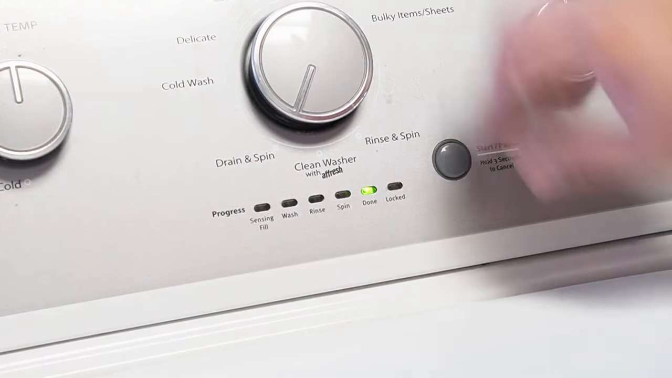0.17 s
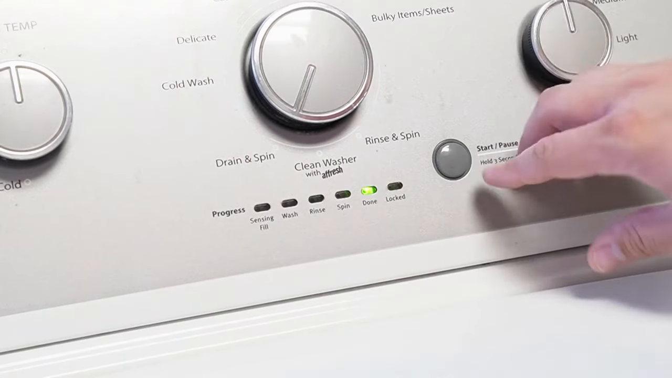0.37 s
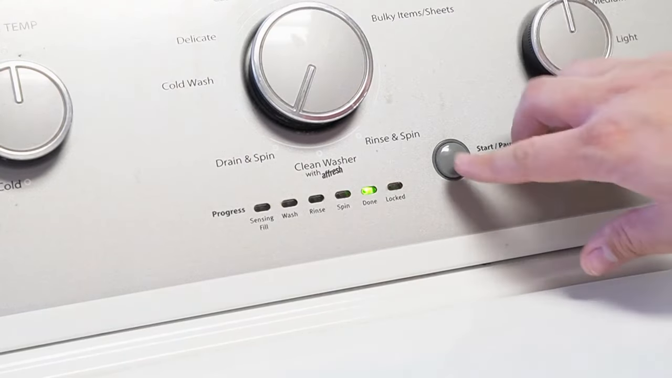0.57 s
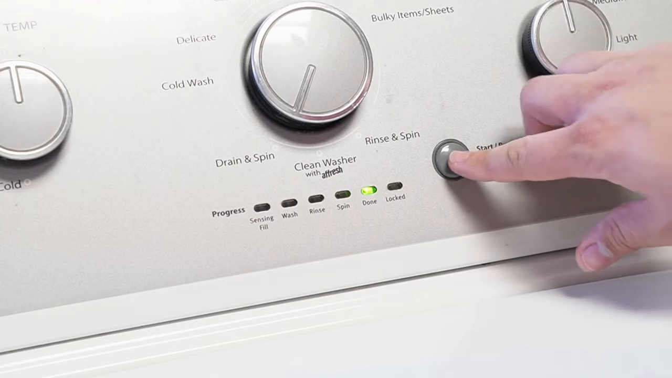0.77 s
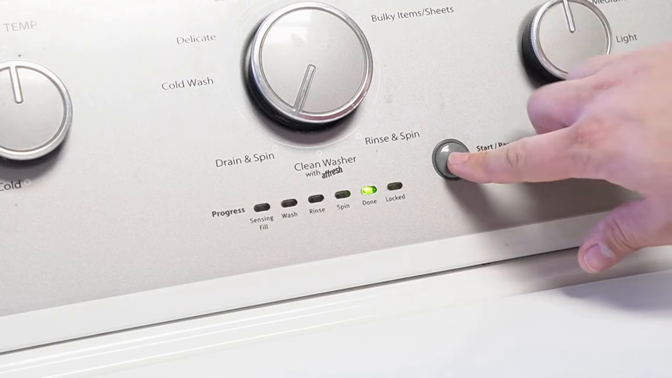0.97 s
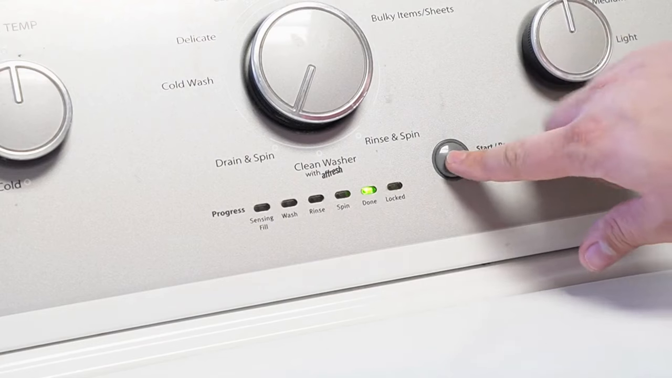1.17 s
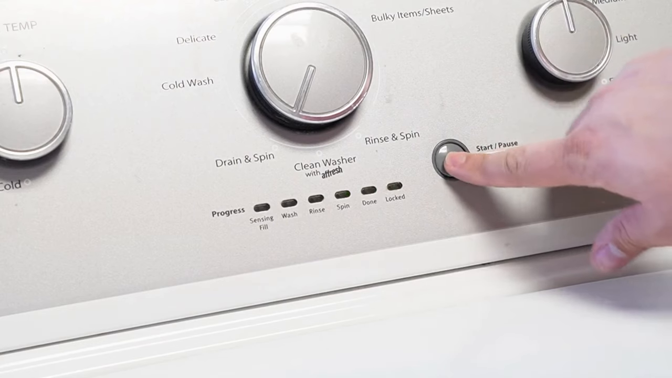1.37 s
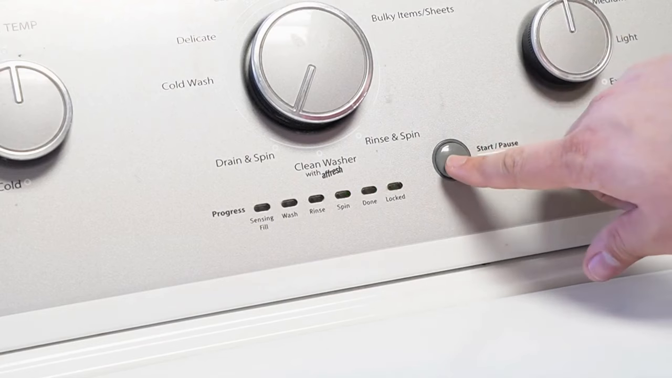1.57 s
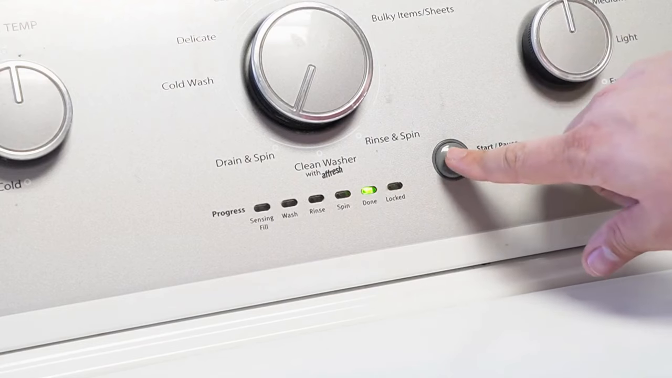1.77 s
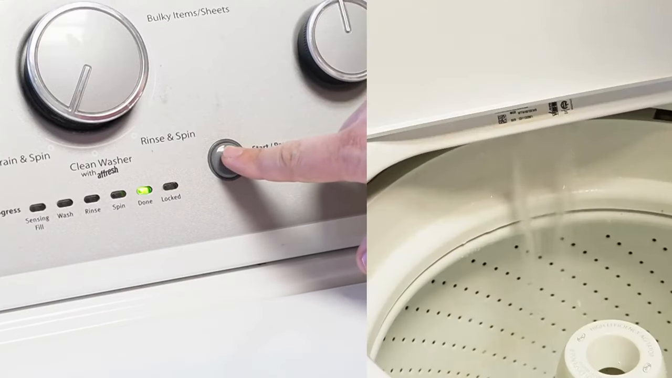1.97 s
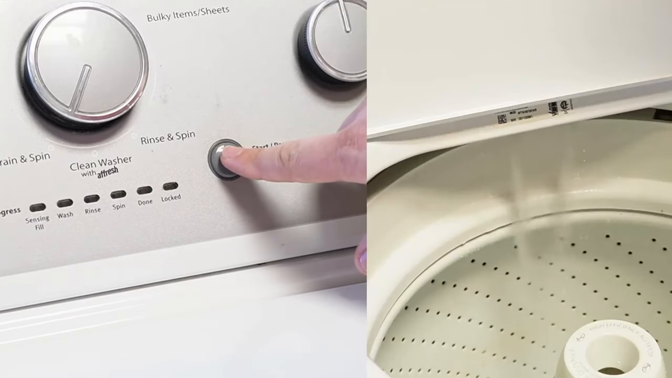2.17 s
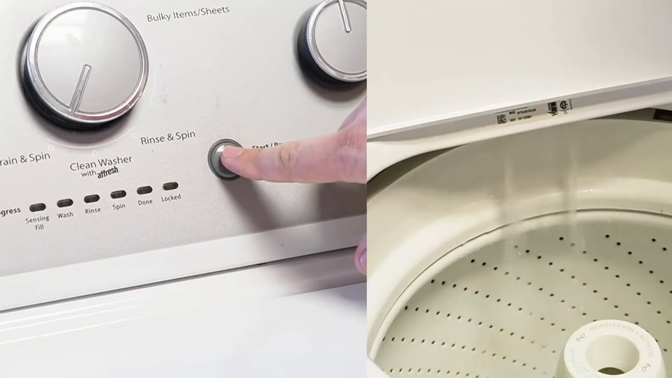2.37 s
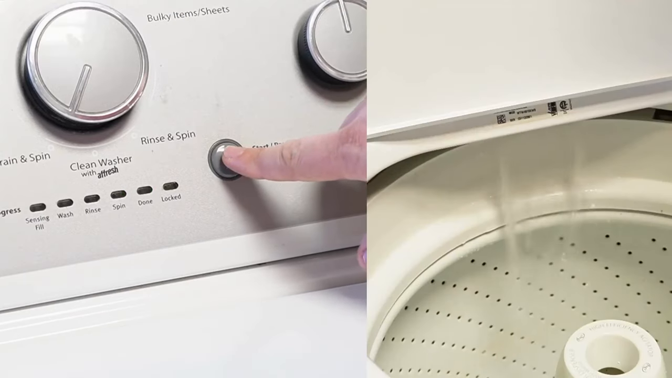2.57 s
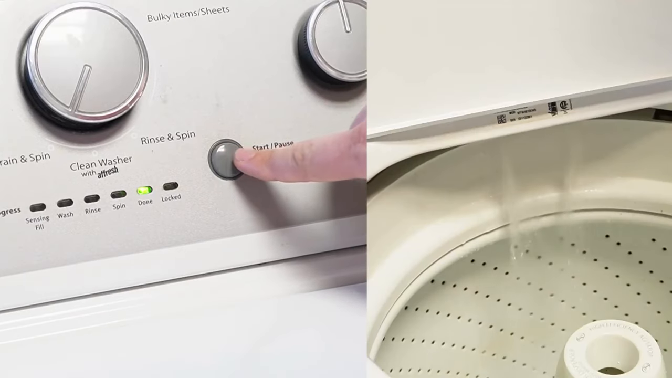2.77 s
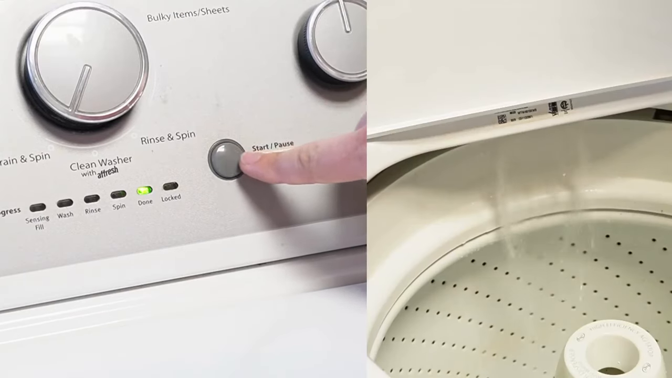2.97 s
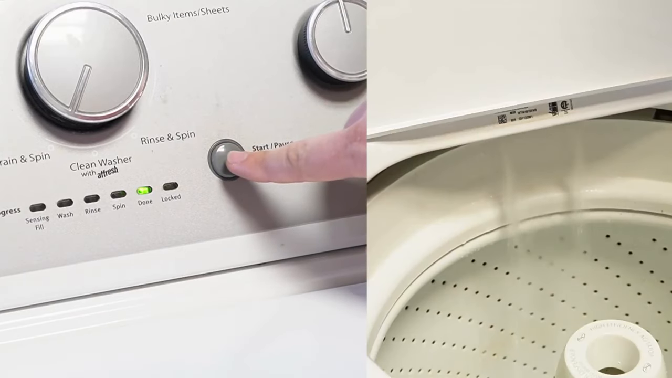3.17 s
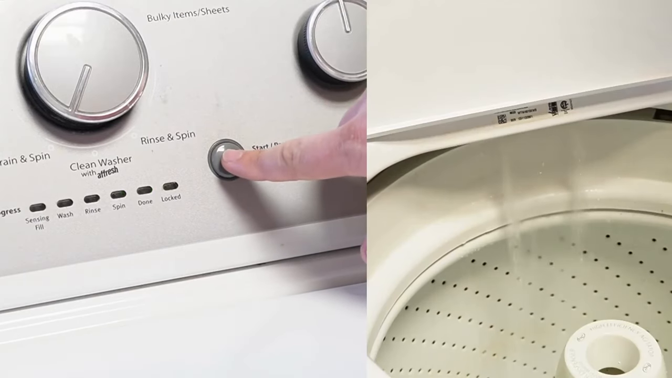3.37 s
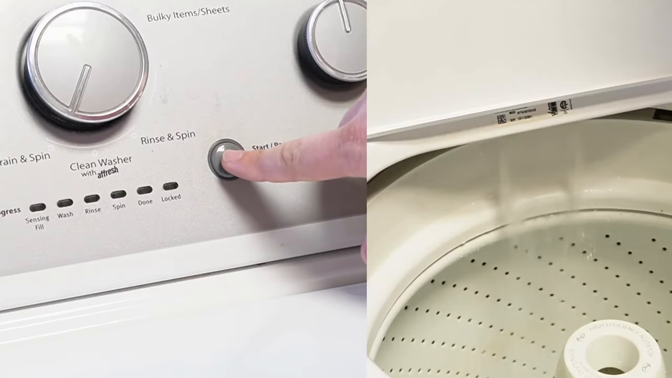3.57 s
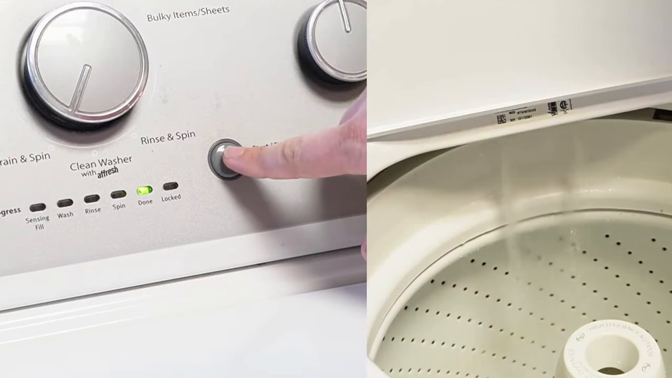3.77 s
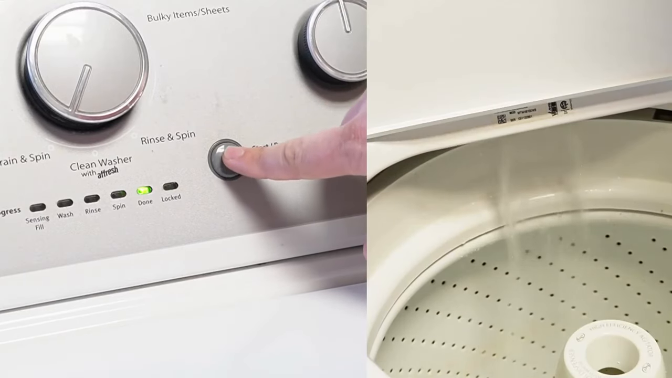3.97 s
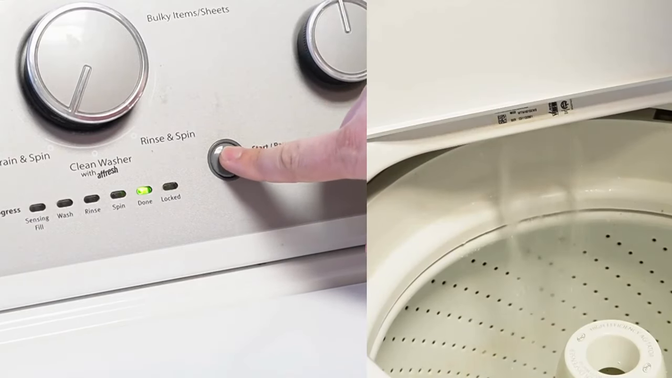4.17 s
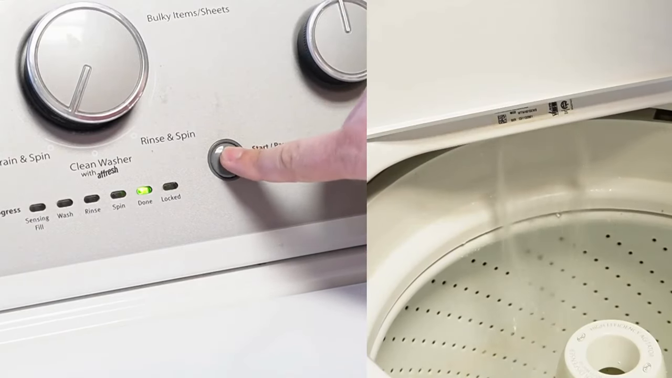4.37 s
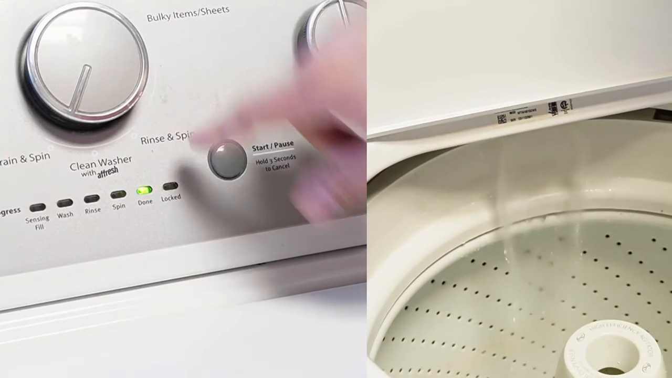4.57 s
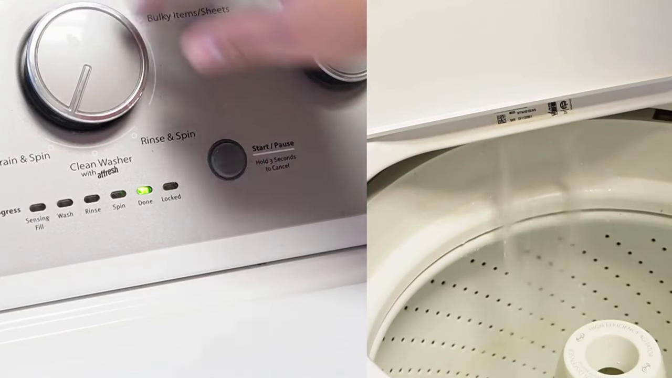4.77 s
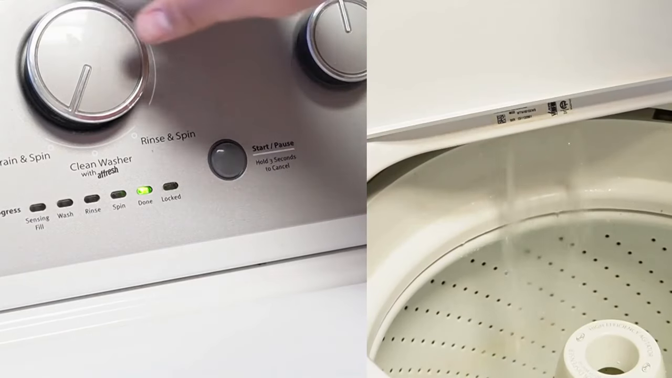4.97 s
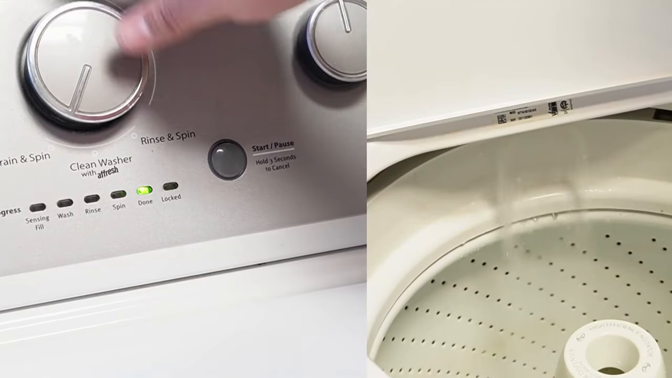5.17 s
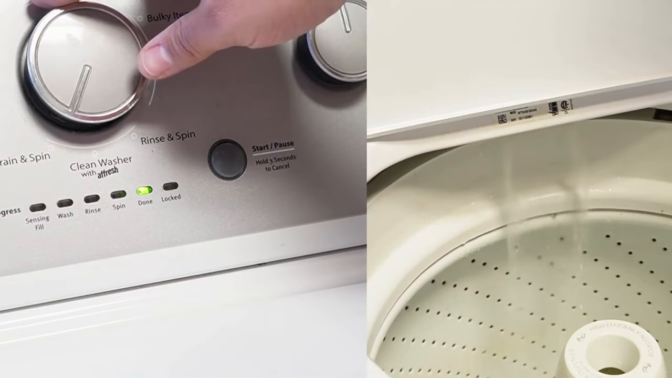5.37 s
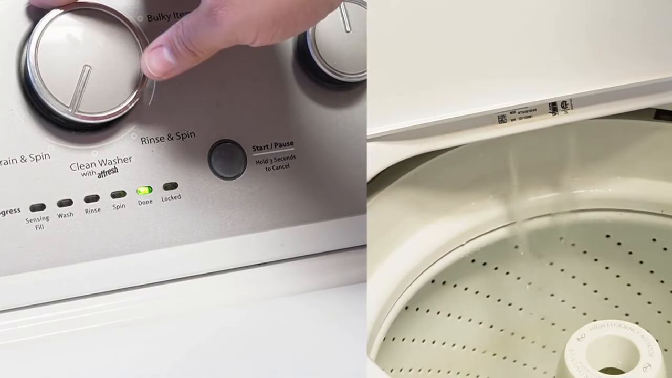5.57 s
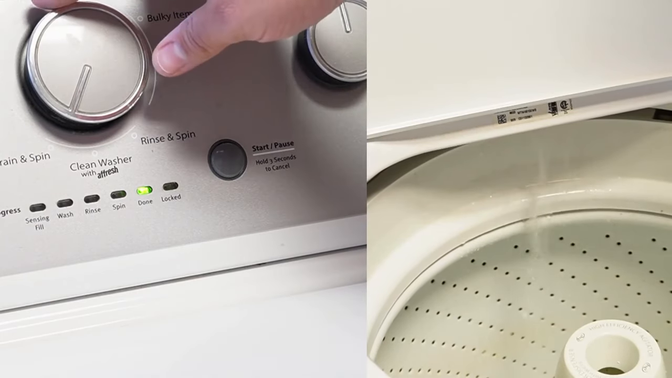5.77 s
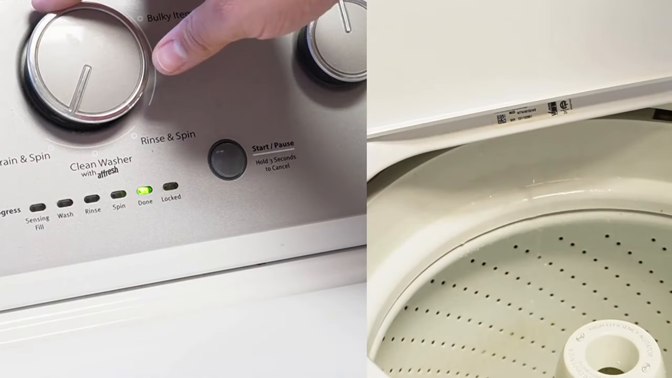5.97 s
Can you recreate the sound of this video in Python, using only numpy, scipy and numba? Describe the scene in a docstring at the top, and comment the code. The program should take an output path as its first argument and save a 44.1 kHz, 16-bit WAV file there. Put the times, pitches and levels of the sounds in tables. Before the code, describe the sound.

After a soft brush and firm button press in a quiet room, a valve snaps, pipes hiss, then water jets sputter brightly into a hollow empty tub.

```python
"""Filling a top-load washer

In a quiet room a hand brushes and presses the panel: grained friction noise and pushes excite its modes.
A valve snaps open and the pipe hisses: turbulent noise in bands, its boom and treble fading as the air goes.
Then jets sputter out: resonant noise bursts spit over a fine spray of hiss, small spurts and drops.
The falling water drums the hollow tub: uneven noise rings its modes."""
import sys
import numpy as np
from scipy import signal
from scipy.fft import rfft, irfft, next_fast_len
from scipy.io import wavfile
from scipy.ndimage import uniform_filter1d
from numba import njit

SR = 44100
rng = np.random.default_rng(int(sys.argv[2]) if len(sys.argv) > 2 else 0)


def materialize(psi):
    """Save the field psi as 16-bit PCM at rate SR to the path in sys.argv[1].

    A 1-D psi becomes a single channel; in a 2-D psi each row is a channel.
    """
    bounded = np.clip(np.atleast_2d(psi).T, -1, 1)
    quanta = np.round(bounded * 32767).astype(np.int16)
    wavfile.write(sys.argv[1], SR, quanta)


N = 265614


def undb(db):
    """Decibel law: dB to amplitude gain."""
    return 10 ** (np.asarray(db) / 20)


def unit(x):
    """Power normalisation: scale to rms 1."""
    return x / np.sqrt(np.mean(x ** 2))


def clock():
    """Sampling: seconds at every sample."""
    return np.arange(N) / SR


def curve(table):
    """Linear interpolation: an (s, dB) table at every sample, -200 dB outside its span."""
    rows = np.array(table)
    return np.interp(clock(), rows[:, 0], rows[:, 1], left=-200, right=-200)


def colour(x, spectrum):
    """Spectral shaping: filter by (Hz, dB) points joined on a log-frequency axis."""
    hz, db = np.transpose(spectrum)
    size = next_fast_len(N)
    bins = np.maximum(np.arange(size // 2 + 1) * SR / size, 1)
    gain = undb(np.interp(np.log(bins), np.log(hz), db))
    return irfft(rfft(x, size) * gain, size)[:N]


def noise():
    """White noise: equal power at all frequencies."""
    return rng.standard_normal(N)


def walk(rate):
    """Slow random modulation: levels held 1 / rate s and smoothed twice, rms 1."""
    held = int(SR / rate)
    steps = np.repeat(rng.standard_normal(N // held + 1), held)
    return unit(uniform_filter1d(uniform_filter1d(steps, held), held)[:N])


def resonance(x, hz, width):
    """Simple resonator: two-pole band-pass, gain 1 at the centre."""
    return signal.lfilter(*signal.iirpeak(hz, hz / width, SR), x)


def butter(x, order, hz, kind):
    """Frequency selection by a Butterworth filter."""
    return signal.sosfilt(signal.butter(order, hz, kind, fs=SR, output="sos"), x)


def split(x, *hz):
    """Band division: neighbouring bands of x parted at the given frequencies, each of rms 1."""
    bands = []
    for edge in hz:
        bands.append(butter(x, 4, edge, "low"))
        x = butter(x, 4, edge, "high")
    return [unit(band) for band in bands + [x]]


def patchy(depth_db, rate):
    """Independent modulation: noise bands flicker each on its own, as separate threads of water do."""
    centres = 60 * 1.5 ** np.arange(14)
    return unit(sum(undb(depth_db * walk(rate)) * resonance(noise(), hz, hz / 2) for hz in centres))


@njit
def bursts(start, size, hz, t60, spread, broad, crack, rise, slap, hiss):
    """Excited resonance: a slap and cracking noise ring a band, whose tail outlasts a broad spit."""
    out = np.zeros(len(hiss))
    for e in range(len(start)):
        # state-variable filter: tuning g, damping = relative bandwidth
        g, damping, band, low = np.tan(np.pi * hz[e] / SR), spread, 0., 0.
        fall = np.exp(-np.log(1000) / (t60[e] * SR))
        loud, spitting, onset = size[e], broad, 0.
        narrow = np.sqrt(SR / (np.pi * spread * hz[e]))  # makes up for the power lost outside the band
        for i in range(start[e], min(len(hiss), start[e] + int(t60[e] * SR))):
            sharp = 1 + crack * np.exp((start[e] - i) / (2 * rise * SR))
            x = hiss[(i + 7919 * e) % len(hiss)] * sharp
            push = slap if i == start[e] + int(rise * SR) else 0.
            v = (band + g * (x + push - low)) / (1 + g * (g + damping))
            band, low = 2 * v - band, low + 2 * g * v
            onset += (1 - onset) / (rise * SR)
            out[i] += loud * onset * (narrow * damping * v + spitting * x)
            loud *= fall
            spitting *= fall  # falls on top of loud, so the broad spit dies first
    return out


def spit(s, db, hz, t60, spread, broad, crack=0., rise=0.00038, slap=0.):
    """Burst excitation: crackling noise rings a band at each of the times s."""
    crackle = unit(noise() * undb(1.4 * walk(2500)))
    start = (s * SR).astype(np.int64)
    hz, t60 = np.clip(hz, 500, .4 * SR), np.clip(t60, .004, .4)
    return bursts(start, undb(db), hz, t60, max(spread, .05), broad, crack, max(rise, 2 / SR), slap, crackle)


# Spectrum of the quiet room. Each row: frequency in Hz, relative level in dB per Hz.
ROOM_SPECTRUM = [(12, -44), (20, 8), (59, -8), (145, -11), (469, -20.5), (674, -22), (1510, -28.5),
                 (2000, -27.5), (2370, -30), (15800, -37)]
# Faint wavering tones. Each row: centre in Hz, width in Hz, level in dB.
ROOM_HUMS = [(475, 20, -82.5), (1580, 15, -90)]
ROOM_DB = -67.5


def room():
    """Stationary noise floor: coloured noise, with narrow bands of noise heard as wavering tones."""
    floor = undb(ROOM_DB + 0.98 * walk(9.7)) * unit(colour(noise(), ROOM_SPECTRUM))
    hums = sum(undb(db + 3.5 * walk(5.2)) * unit(resonance(noise(), hz, width)) for hz, width, db in ROOM_HUMS)
    return floor + hums


def flutter():
    """Exponential decay: a low narrow-band flutter dies away from the start."""
    start_db, db_per_s = -64, -51
    return undb(start_db + db_per_s * clock()) * unit(resonance(noise(), 28, 12))


# Spectrum of skin friction. Each row: frequency in Hz, relative level in dB per Hz.
SKIN_SPECTRUM = [(88, -43), (150, -14), (382, -2), (459, -6), (810, -5.5), (1280, -15.5), (2950, -18.5),
                 (3200, -19), (3500, -20), (12000, -33.5), (15600, -66), (22000, -120)]
# Skin brushing the panel. Each row: start in seconds, time held in seconds, level in dB, fade in dB per second.
BRUSH_STROKES = [(.345, 0.0037, -64, 900), (.44, .025, -72.5, 150), (.525, 0.035, -70, 300),
                 (.58, .027, -73, 1500), (1.1, .01, -76, 100), (1.158, .014, -65, 600),
                 (1.178, 0.005, -57, 1000), (1.204, 0.0032, -52, 1100), (1.225, 0.03, -69.5, 250)]
BRUSH_SWELL_DB_PER_S = 1800


def brushing():
    """Friction noise: skin rustles in uneven grains, swelling and fading with each stroke."""
    skin = colour(noise() * undb(1.4 * walk(220)), SKIN_SPECTRUM)
    skin = skin / resonance(skin, 2500, 5000).std()
    now = clock()
    strokes = 0
    for s, held, db, fade in BRUSH_STROKES:
        swell = BRUSH_SWELL_DB_PER_S * np.maximum(s - now, 0)
        strokes = strokes + undb(db - swell - fade * np.maximum(now - s - held, 0))
    return skin * strokes


# Modes of the sheet-metal panel. Each row: frequency in Hz, relative level in dB, decay time T60 in seconds.
PANEL_MODES = [(376, 3.5, 0.068), (477, -17, 0.041), (600, 6.5, 0.03), (780, 2.5, 0.037), (900, 4, 0.035),
               (1420, -12, 0.036), (326, -11, 0.24), (522, -15.5, 0.29), (700, -15, 0.24)]
# Knocks on the panel. Each row: time in seconds, peak level in dB.
PANEL_KNOCKS = [(0.355, -52.5), (0.537, -58), (1.096, -64), (1.177, -48), (1.201, -29.5)]
SKIN_RINGS_DB = -22  # how much of the rustle's slope passes into the panel


def hand():
    """Modal excitation: soft pushes and the rustle of skin ring the sheet-metal panel."""
    rustle = brushing()
    t = np.arange(int(.3 * SR)) / SR
    ring = 0
    for k, (hz, db, t60) in enumerate(PANEL_MODES):
        decay = 1000 ** (-t / np.clip(t60, .02, .4))
        ring = ring + undb(db) * np.sin(2 * np.pi * hz * t + k ** 2) * decay
    ring = ring * (1 - np.exp(-t / 0.0017)) ** 2  # soft onset
    blows = np.zeros(N)
    for s, db in PANEL_KNOCKS:
        blows[int(s * SR)] = undb(db)
    drive = blows + undb(SKIN_RINGS_DB) * np.diff(rustle, prepend=0)
    return rustle + signal.fftconvolve(drive, ring / np.abs(ring).max())[:N]


# The valve opens on a murmur, then water reaches the pipe and drives the air out until the jets begin.
VALVE_S, WATER_S, AIR_GONE_S, JETS_S = 1.3, 1.389, 1.59, 1.858
# Ringing of the valve snap. Each row: frequency in Hz, level in dB, decay time T60 in seconds.
VALVE_SNAP = [(2960, -39.5, 0.046), (5800, -40, 0.044), (9000, -37.5, 0.043)]


def valve():
    """Impulsive excitation: the snap cracks and rings three bands at once."""
    hz, db, t60 = np.transpose(VALVE_SNAP)
    return spit(np.full(len(hz), VALVE_S), db, hz, t60, spread=0.23, broad=0., crack=1.)


# Rush as heard through the cabinet. Each row: frequency in Hz, relative level in dB per Hz.
PIPE_SPECTRUM = [(35, -49.5), (60, -7), (167, -10.5), (240, 3), (400, -1.5), (817, -1), (1240, -4.5),
                 (2080, -13), (5660, -20), (8820, -20.5), (15800, -25)]
# Resonances of the feed pipe. Each row: centre in Hz, width in Hz, mean gain in dB.
PIPE_RESONANCES = [(2100, 80, 0), (2860, 290, -0.5), (3330, 120, 0), (4500, 410, -1), (5260, 120, -6)]
MURMUR_DB, MURMUR_DB_PER_S, RUSH_DB, RUSH_SWELL_DB_PER_S = -51.5, -90, -44.5, 330
# band levels against the middle of the rush, and what the air adds to each
PIPE_BOOM_DB, PIPE_HISS_DB, PIPE_TOP_DB = -5, -8.5, -15.5
AIR_BOOM_DB, AIR_HISS_DB, AIR_TOP_DB = 9, 9, 9
AIR_HELD_S = 0.092  # full air for this long after the water comes


def pipe():
    """Turbulent flow noise: a resonant rush whose boom and treble stay strong at first, then fade as the air goes."""
    rush = patchy(1.6, 59.9) * undb(0.61 * walk(120))
    rush = rush + sum(undb(db + 5.2 * walk(24.9)) * resonance(rush, hz, width)
                      for hz, width, db in PIPE_RESONANCES)
    boom, body, hiss, top = split(colour(rush, PIPE_SPECTRUM), 450, 2500, 7000)
    t = clock()
    air = np.interp(t, [WATER_S + AIR_HELD_S, AIR_GONE_S], [1, 0])
    murmur_db = MURMUR_DB + MURMUR_DB_PER_S * (t - VALVE_S)
    rush_db = np.clip(RUSH_DB + RUSH_SWELL_DB_PER_S * (t - WATER_S), murmur_db, RUSH_DB)
    is_open = (t > VALVE_S) * (t < JETS_S)
    mix = body + undb(PIPE_HISS_DB + AIR_HISS_DB * air) * hiss
    mix = mix + undb(PIPE_TOP_DB + AIR_TOP_DB * air ** 1.8) * top
    mix = mix + undb(PIPE_BOOM_DB + AIR_BOOM_DB * air + 2.2 * walk(45.1)) * boom
    return undb(rush_db) * is_open * mix


# Surges and dips of the flow. Each row: centre in seconds, half-length in seconds, spray swell in dB.
FLOW_SURGES = [(1.912, 0.019, 2.5), (3.443, 0.037, 2.5), (4.75, 0.085, 3), (5.551, 0.035, 5.5),
               (5.62, 0.011, 3.5), (5.685, 0.018, -2), (5.9, 0.028, -3)]
SLACK_S, SLACK_DB_PER_S, SLACK_MOST_DB = 5.664, -26, -8  # the jets slacken at the end


def flow():
    """Common modulation: seconds since the jets began, surge and slack in dB, and -200 dB while shut."""
    t = clock()
    surge = sum(db * np.exp(-((t - s) / length) ** 2) for s, length, db in FLOW_SURGES)
    slack = np.clip(SLACK_DB_PER_S * (t - SLACK_S), SLACK_MOST_DB, 0)
    return t - JETS_S, surge, slack, np.where(t < JETS_S, -200, 0)


GATHERS_S = 0.13  # time constant of the gathering water


def gathering(since):
    """Exponential relaxation: shortfall from 1 to 0 as water gathers."""
    return np.exp(-np.maximum(since, 0) / GATHERS_S)


DRUM_DB, DRUM_LATE_DB = -35.5, 3  # the drumming starts soft until water gathers
DRUM_PER_SURGE, DRUM_PER_SLACK = 1.02, 0.69  # dB of drumming per dB of spray


def drumming_db():
    """Flow-dependent impact level: dB of the water on the tub."""
    since, surge, slack, shut = flow()
    return DRUM_DB - DRUM_LATE_DB * gathering(since) + DRUM_PER_SURGE * surge + DRUM_PER_SLACK * slack + shut


def rumble():
    """Flow-coupled low-frequency noise: a twice-filtered band rises with the drumming."""
    low = resonance(resonance(noise(), 58, 70), 58, 90)
    return undb(-42.5 + 0.63 * drumming_db()) * unit(low)


# Modes of the empty tub. Each row: frequency in Hz, width in Hz, relative level in dB per Hz.
TUB_MODES = [(81, 5.5, -13.5), (156.8, 28.4, -9), (233.8, 27, -7), (364, 33.4, -9.5), (446, 183, -13.5),
             (566.4, 64, -6), (641.3, 32.3, -3.5), (818, 96, -8), (1147, 110, -17)]
# Chance swells of a narrow noise band heard as a hollow note. Each row: time in seconds, level in dB.
HOLLOW_SWELLS = [(1.86, -43), (2.15, -41), (3.03, -46), (3.09, -36), (4.61, -41), (4.64, -29.5), (4.8, -43),
                 (5.22, -35), (5.37, -55), (5.49, -36.5), (6.02, -44)]
HOLLOW_HZ = 268.3


def tub():
    """Modal response: uneven lumps of water ring the empty tub; a narrow noise band is heard as a hollow note."""
    lumps = noise() * undb(2.0 * walk(90))
    drum = 0
    for k, (hz, width, db) in enumerate(TUB_MODES):
        mode = unit(resonance(lumps, hz, width)) * np.sqrt(width)
        drum = drum + (-1) ** k * undb(db + 2.2 * walk(18)) * mode
    drum = butter(drum, 2, [70, 1300], "band")
    hollow = resonance(resonance(lumps, HOLLOW_HZ, 15), HOLLOW_HZ, 69)
    return undb(drumming_db()) * unit(drum) + undb(curve(HOLLOW_SWELLS)) * unit(hollow)


def small_spurts():
    """Random superposition: a swarm of 700 bursts per second of random size and colour."""
    when, size, pitch, length = rng.random((int(700 * N / SR), 4)).T
    db = np.minimum(-2.4 * np.log(1 - size), 8.0)
    return spit(when * N / SR, db, 2500 * 6.8 ** pitch, 0.025 * 2.8 ** length,
                spread=0.24, broad=0.92, crack=0.24)


def drops():
    """Struck resonance: 120 slapped drops per second ring narrow bands."""
    when, size, pitch = rng.random((int(120 * N / SR), 3)).T
    db = np.minimum(-3.5 * np.log(1 - size), 12.0)
    return spit(when * N / SR, db, 1800 * 3.52 ** pitch, np.full(len(when), .03),
                spread=0.031, broad=0., slap=12.4)


# Colour of the spray and the loud spurts. Each row: frequency in Hz, relative gain in dB.
SPRAY_SPECTRUM = [(590, -27), (1000, -4), (1500, -6), (1780, -3), (2500, -6), (4540, -2.5), (6800, -2.5),
                  (7900, -0.5), (8670, 2), (9400, -1), (10500, -9), (13600, -0.5), (15800, -11)]
SPRAY_DB, SPRAY_DB_PER_S, SPRAY_LATE_DB = -26.5, -0.75, 1  # weakens slowly, starts soft until water gathers
TOP_PER_SURGE, TOP_PER_SLACK = -0.71, -0.31  # surges are dull, the thin end is bright
BODY_DB_PER_S = 0.27  # the spray under 3 kHz fills out as water gathers


def fine_spray():
    """Dense noise mixture: hiss, small spurts and drops share a colour that changes with the flow."""
    hiss = patchy(3.95, 30) * undb(1.6 * walk(14))
    mixture = undb(-2.5) * hiss + unit(small_spurts()) + undb(-11) * unit(drops())
    fine = unit(colour(mixture, SPRAY_SPECTRUM))
    top = butter(fine, 2, 6000, "high")
    body = butter(fine, 2, 3000, "low")
    since, surge, slack, shut = flow()
    fine = fine + (undb(TOP_PER_SURGE * surge + TOP_PER_SLACK * slack) - 1) * top
    fine = fine + (undb(surge + BODY_DB_PER_S * since) - 1) * body
    level_db = SPRAY_DB + SPRAY_DB_PER_S * since - SPRAY_LATE_DB * gathering(since)
    return undb(level_db + surge + slack + shut) * fine


LULL_DB, LULL_S, LULL_FULL_DB = -1.5, 0.023, -10  # depth, lead time, and spurt peak above which it is full


def lull(s, db):
    """Anticipatory modulation: gain that thins the spray just before each spurt."""
    coming = np.zeros(N)
    coming[(s * SR).astype(int)] = np.minimum(undb(db - LULL_FULL_DB), 1)
    lead = np.linspace(0, 1, int(LULL_S * SR))
    depth = signal.fftconvolve(coming, lead)[len(lead) - 1:]  # shifted to end at the spurt
    return undb(LULL_DB * np.minimum(depth, 1))


CREST_DB = 18.5  # peaks of a spurt above its rms
GOB_LATE_S, GOB_DB = .007, -3  # mean delay and level of the second gob


def gobs(s, db, hz, length):
    """Jet break-up: a second gob of another colour lands just behind the first."""
    delay, shift = rng.random((len(s), 2)).T
    first = spit(s, db - CREST_DB, hz, length, spread=0.4, broad=0.81, crack=1.33, slap=11.5)
    second = spit(s + GOB_LATE_S * (.5 + delay), db - CREST_DB + GOB_DB, hz * 2 ** (shift - .5), length,
                  spread=0.45, broad=0.57, crack=0.55)
    return colour(first + second, SPRAY_SPECTRUM) / colour(noise(), SPRAY_SPECTRUM).std()


MIST_DB, MIST_DB_PER_OCTAVE, MIST_SCATTER_DB = -17, 2, 5  # against the peak of an 8 kHz spurt


def mist(s, db, hz, length):
    """High-frequency burst noise: a band at 13 kHz, stronger for brighter spurts."""
    scatter = 2 * rng.random(len(s)) - 1
    mist_db = MIST_DB + MIST_DB_PER_OCTAVE * np.log2(hz / 8e3) + MIST_SCATTER_DB * scatter
    return spit(s, db + mist_db, np.full(len(s), 13000.), 0.93 * length, spread=0.37, broad=0., crack=0.6)


# Ringing of the basket wall. Each row: frequency in Hz, mean level in dB, decay time T60 in seconds.
BASKET_MODES = [(2700, -13.5, 0.11), (3310, -6.5, 0.086), (4600, -2, 0.088)]
HEAVY_HZ = 5000  # spurts under this are heavy and wet
SPLAT_DB, SPLAT_HZ, SPLAT_T60_S = -11.5, 1300, 0.066


def heavy_impacts(s, db, hz):
    """Impact radiation: heavy spurts ring the basket wall and add a dull, broad splat."""
    heavy = hz < HEAVY_HZ
    s, rms_db = s[heavy], db[heavy] - CREST_DB
    each = np.ones(len(s))
    sound = spit(s, rms_db + SPLAT_DB, SPLAT_HZ * each, SPLAT_T60_S * each, spread=1.3, broad=0., crack=.8)
    for mode_hz, mode_db, t60 in BASKET_MODES:
        scatter_db = 4.7 * rng.standard_normal(len(s))
        sound = sound + spit(s, rms_db + mode_db + scatter_db, mode_hz * each, t60 * each,
                             spread=0.042, broad=0., crack=0.73, slap=10.8)
    return sound


def tub_reflections(water):
    """Reverberant reflection: faint decaying echoes inside the tub ripple the spectrum."""
    echoes = rng.standard_normal(1500) * 1000 ** (-np.arange(1500) / (0.091 * SR)) * undb(-36.0)
    echoes[0] = 1
    return signal.fftconvolve(water, echoes / np.linalg.norm(echoes))[:N]


# The loudest spurts. Each row: time in seconds, nominal peak level in dB, centre in Hz.
LOUD_SPURTS = [(1.856, -22, 3080), (1.88, -12, 9000), (1.8986, -11.5, 8790), (1.9897, -6, 7550),
               (2.0445, -7.5, 4570), (2.116, -3.5, 13200), (2.1416, -13, 9250), (2.1665, -7, 5850),
               (2.206, -8, 7660), (2.2204, -8, 6900), (2.248, -6.5, 8510), (2.2824, -17, 8940),
               (2.313, -13, 4220), (2.345, -7.5, 8070), (2.381, -11, 7790), (2.4437, -10, 8500),
               (2.5107, -11, 4940), (2.524, -3, 6060), (2.6301, -13, 8380), (2.661, -7.5, 6070),
               (2.6828, -9, 4700), (2.748, -9, 8500), (2.7905, -14, 8870), (2.8266, -9.5, 5140),
               (2.8568, -4, 8100), (2.8954, -6, 8840), (3, -12, 8470), (3.124, -8.5, 8650),
               (3.206, -5.5, 9110), (3.2463, -11.5, 4750), (3.281, -9, 7540), (3.349, -12.5, 7490),
               (3.417, -14, 7000), (3.435, -7, 8520), (3.4534, -6, 8690), (3.4841, -11.5, 4170),
               (3.4944, -9, 5650), (3.5253, -10, 9000), (3.6484, -9.5, 7640), (3.672, -2, 12800),
               (3.6947, -15, 8380), (3.777, -7.5, 8430), (3.821, -9, 8860), (3.832, -13, 8300),
               (3.855, -11, 8390), (3.9268, -9.5, 8900), (3.988, -11, 8600), (4.0087, -8, 8800),
               (4.061, -6, 8700), (4.1382, -9, 8870), (4.268, -9, 10400), (4.3342, -10.5, 8200),
               (4.4179, -8, 5570), (4.474, -8.5, 8400), (4.5078, -11, 9300), (4.628, -11, 8800),
               (4.666, -5.5, 6200), (4.719, -10, 4100), (4.7983, -10.5, 8490), (4.829, -12.5, 4910),
               (4.87, -11.5, 8280), (4.8983, -9, 4980), (4.9867, -12, 6140), (5.049, -9.5, 7000),
               (5.061, -11, 8600), (5.074, -5, 6400), (5.082, -8, 8000), (5.2444, -8, 5560),
               (5.288, -10.5, 4150), (5.3298, -8.5, 6310), (5.41, -14, 1960), (5.434, -14, 4690),
               (5.4482, -7.5, 8540), (5.468, -15.5, 3090), (5.521, -7.5, 2700), (5.5395, -11.5, 4600),
               (5.5784, -2, 3300), (5.607, -12, 2367), (5.648, -11, 4300), (5.657, -16, 8000),
               (5.71, -9.5, 5020), (5.741, -17, 4220), (5.7733, -9, 6200), (5.7899, -11, 7700),
               (5.835, -14.5, 8540)]


def jets():
    """Two-phase flow: spurts of water and air spit over a fine spray."""
    s, db, hz = np.transpose(LOUD_SPURTS)
    length = 0.036 * 2.2 ** rng.random(len(s))
    water = fine_spray() * lull(s, db)
    water = water + gobs(s, db, hz, length) + mist(s, db, hz, length) + heavy_impacts(s, db, hz)
    return tub_reflections(water)


def scene():
    """Linear superposition: all sources add in the middle."""
    mid = room() + flutter() + hand() + valve() + pipe() + rumble() + tub() + jets()
    return np.array([mid, mid])


def record(dry):
    """Band limiting: both equal channels are cut above 15.9 kHz."""
    return signal.sosfilt(signal.ellip(10, .2, 75, 15900, fs=SR, output="sos"), dry)


dry = scene()
out = record(dry)
materialize(out)
```